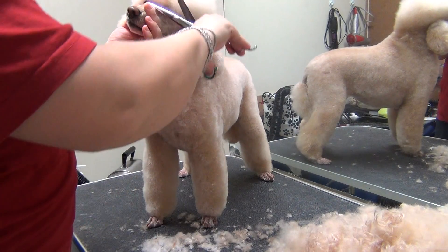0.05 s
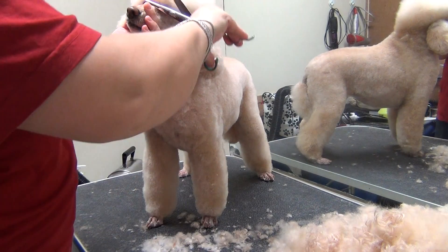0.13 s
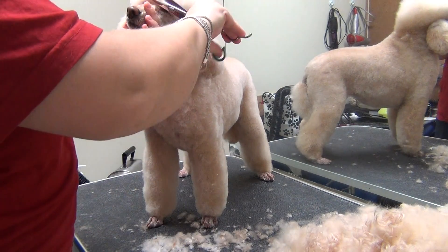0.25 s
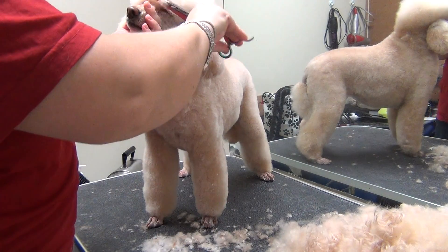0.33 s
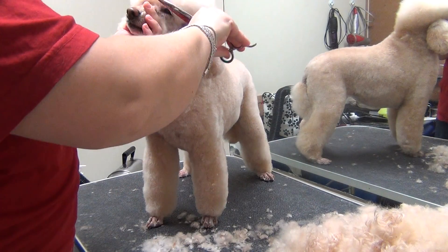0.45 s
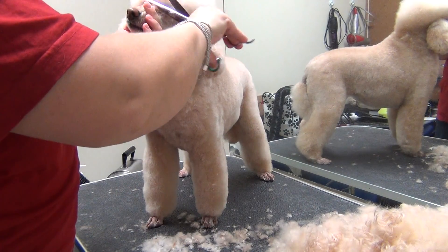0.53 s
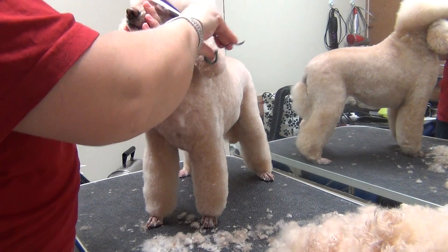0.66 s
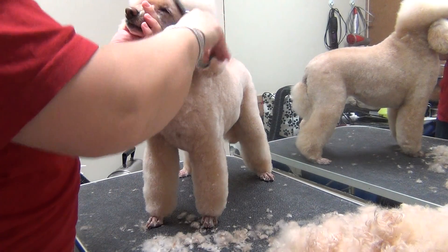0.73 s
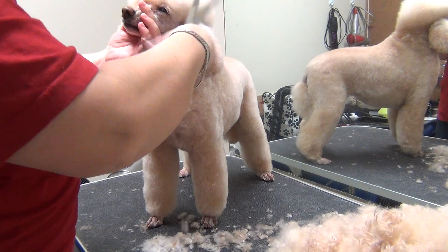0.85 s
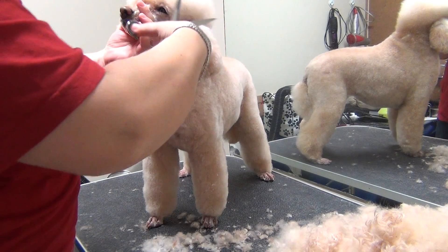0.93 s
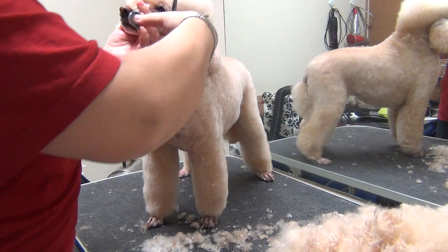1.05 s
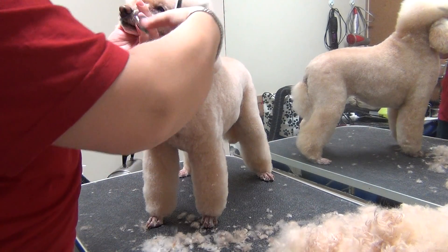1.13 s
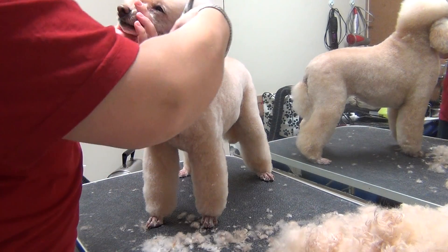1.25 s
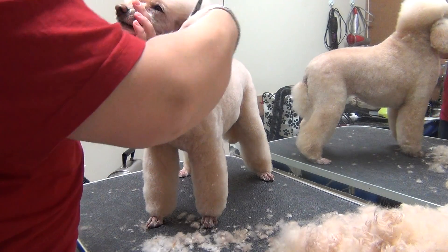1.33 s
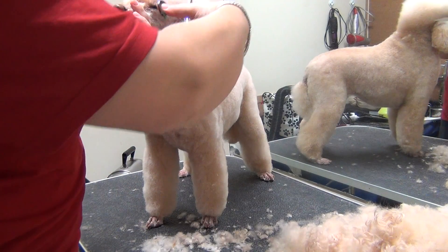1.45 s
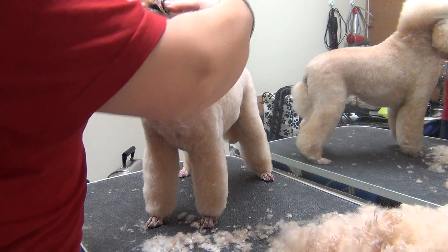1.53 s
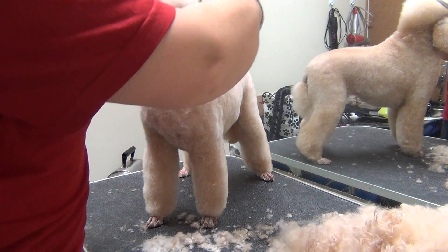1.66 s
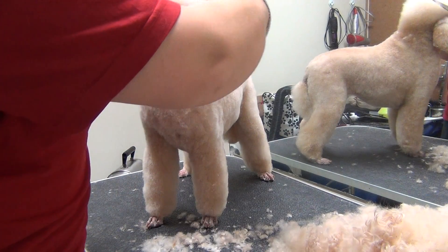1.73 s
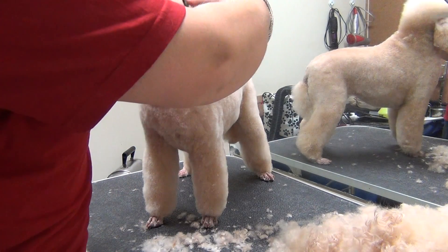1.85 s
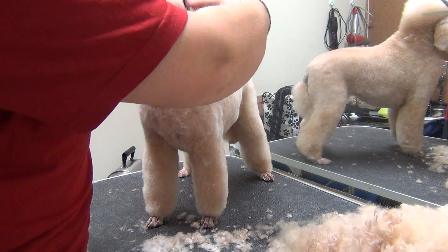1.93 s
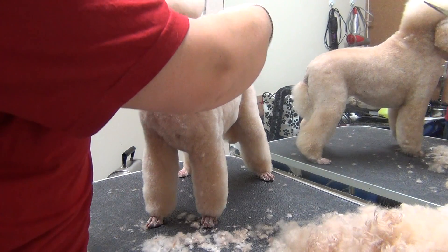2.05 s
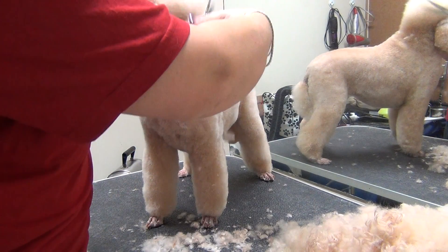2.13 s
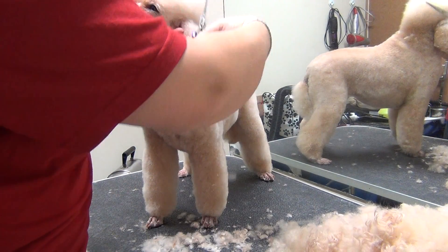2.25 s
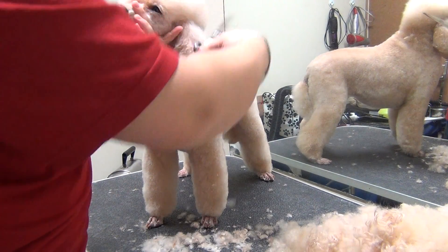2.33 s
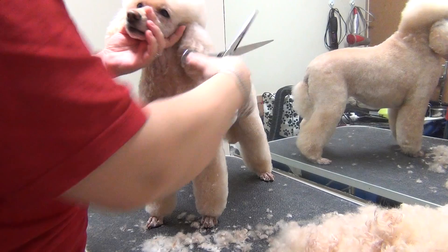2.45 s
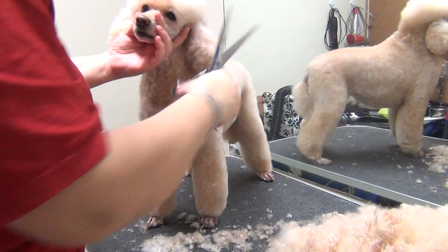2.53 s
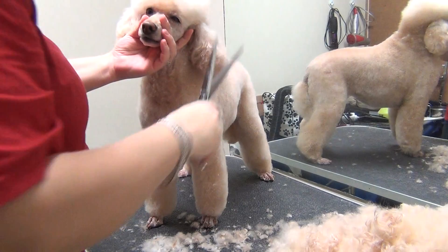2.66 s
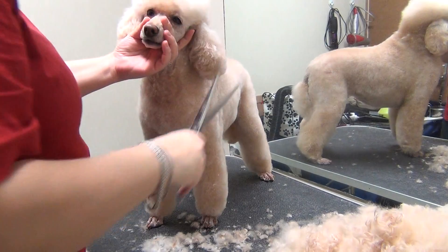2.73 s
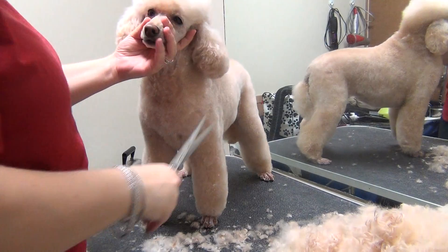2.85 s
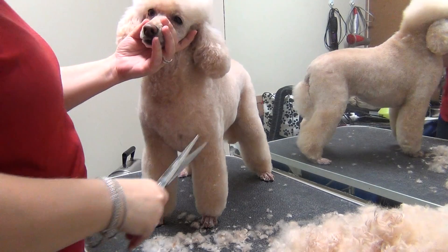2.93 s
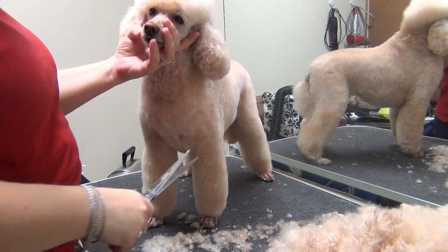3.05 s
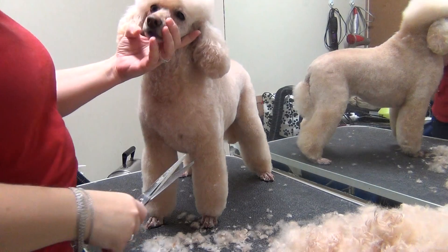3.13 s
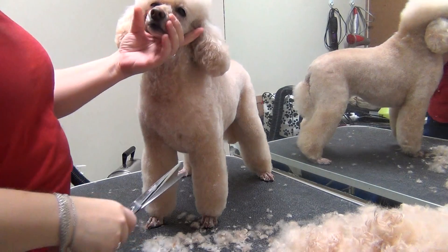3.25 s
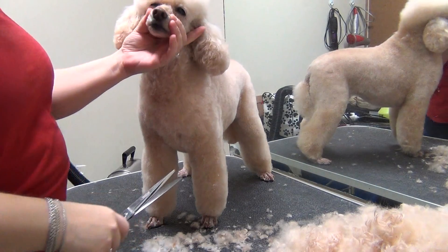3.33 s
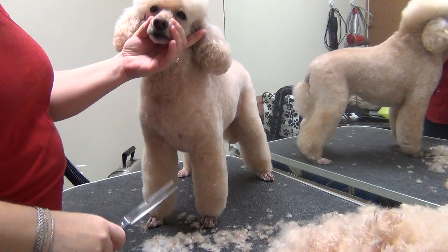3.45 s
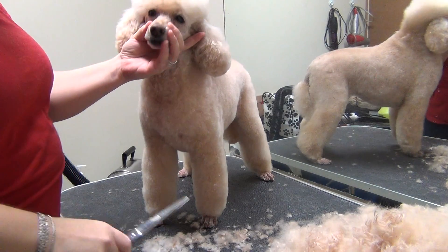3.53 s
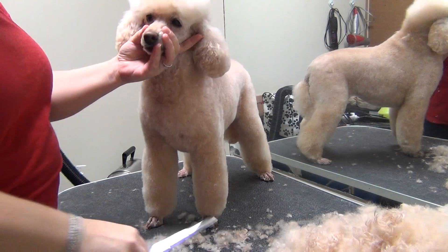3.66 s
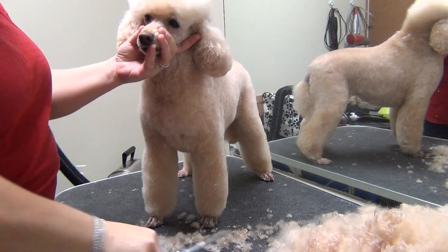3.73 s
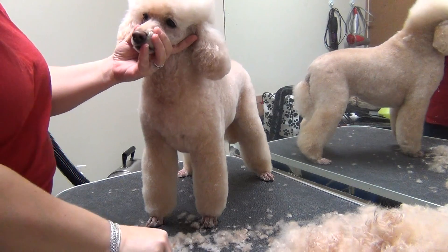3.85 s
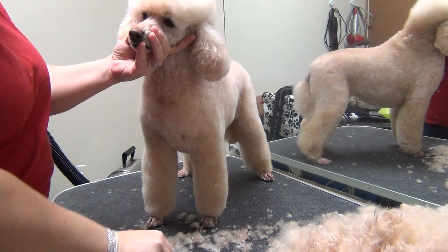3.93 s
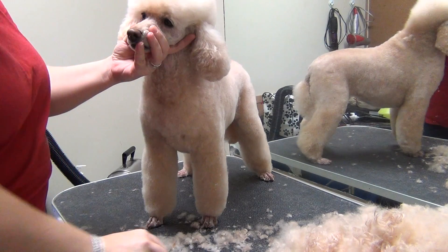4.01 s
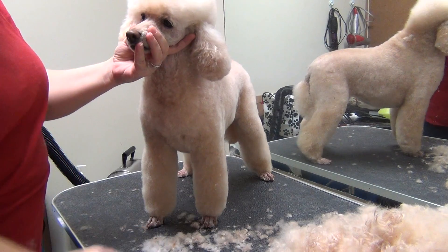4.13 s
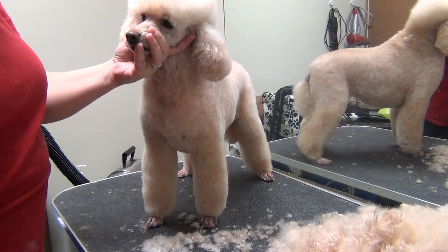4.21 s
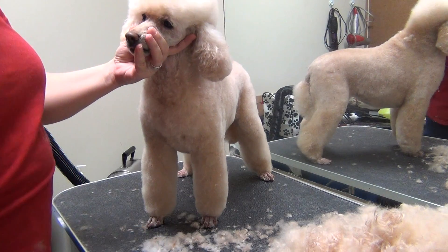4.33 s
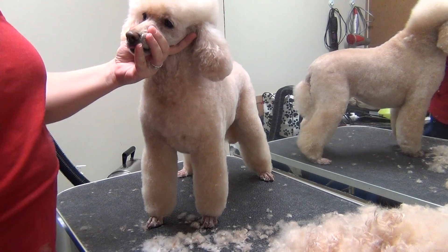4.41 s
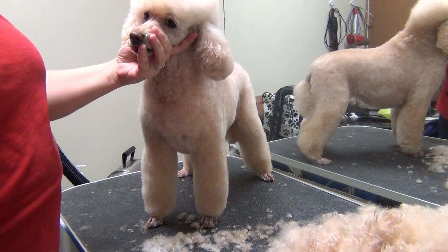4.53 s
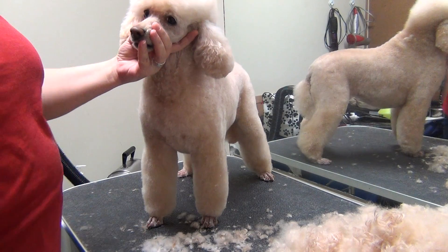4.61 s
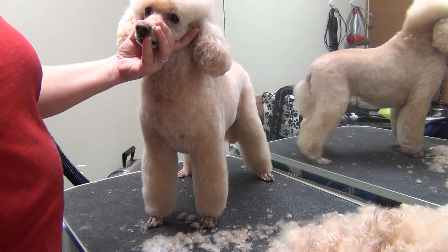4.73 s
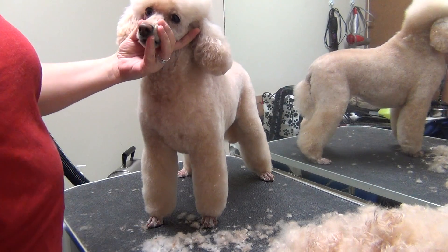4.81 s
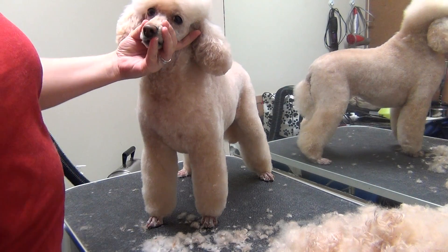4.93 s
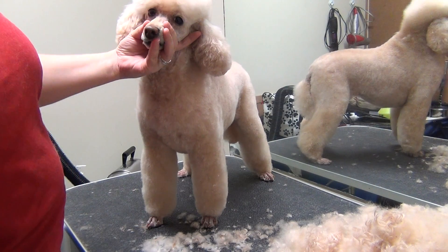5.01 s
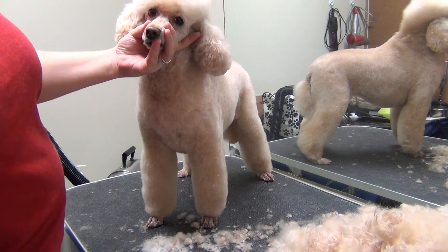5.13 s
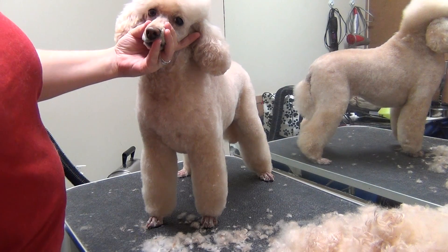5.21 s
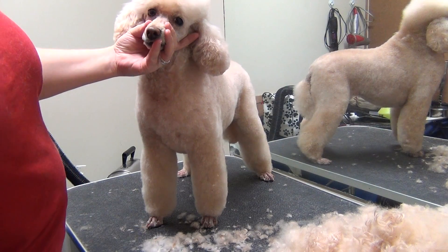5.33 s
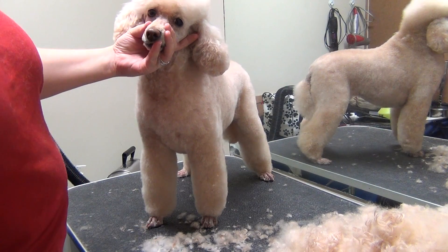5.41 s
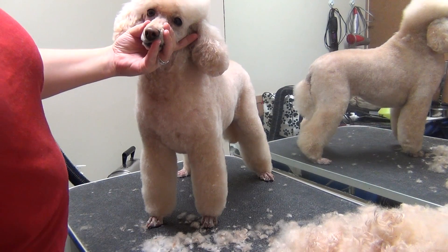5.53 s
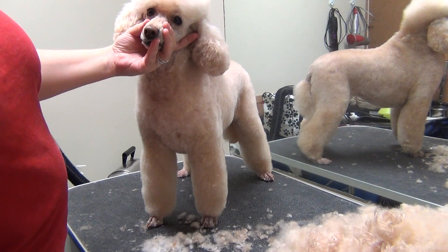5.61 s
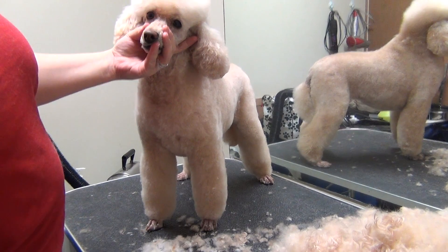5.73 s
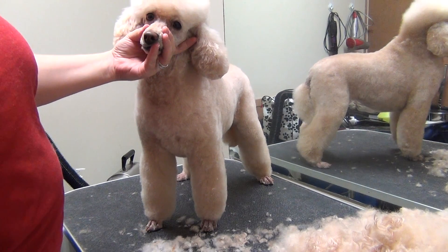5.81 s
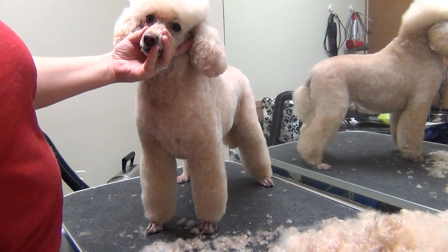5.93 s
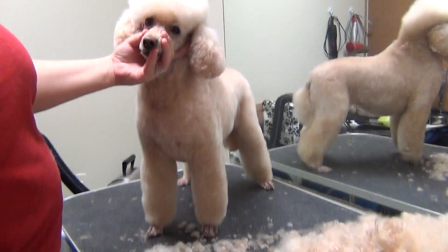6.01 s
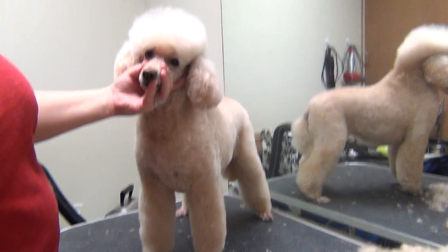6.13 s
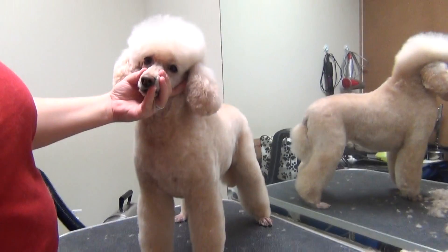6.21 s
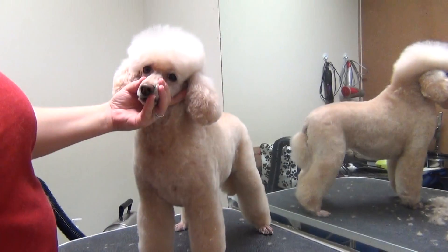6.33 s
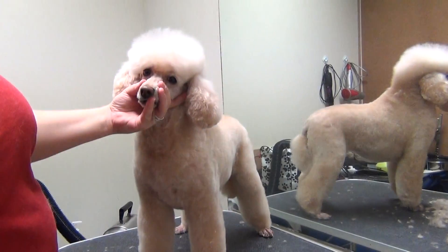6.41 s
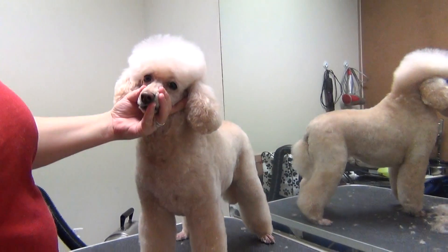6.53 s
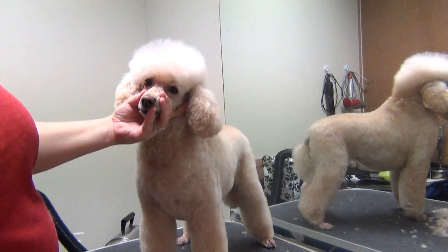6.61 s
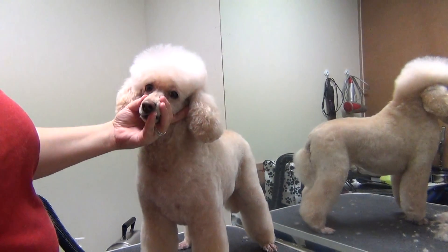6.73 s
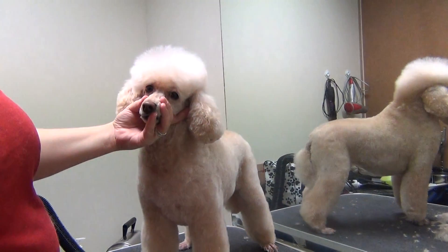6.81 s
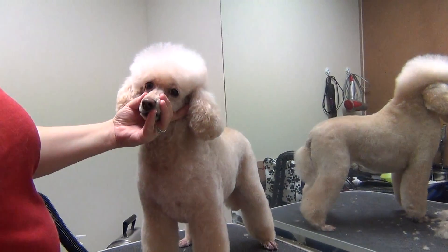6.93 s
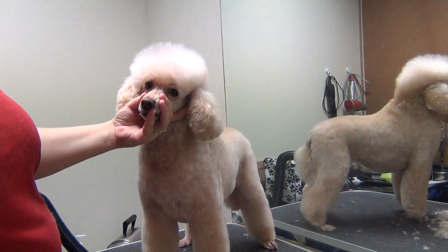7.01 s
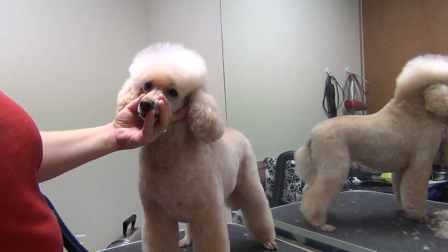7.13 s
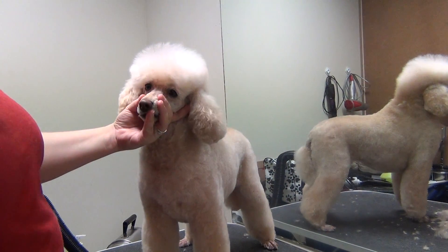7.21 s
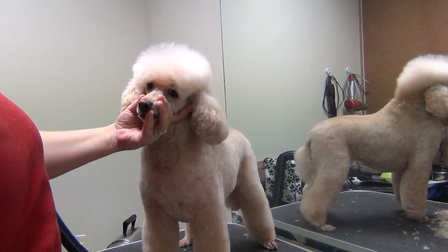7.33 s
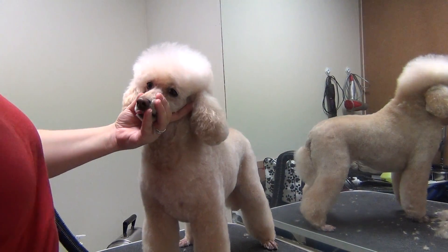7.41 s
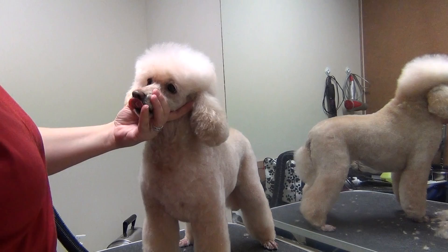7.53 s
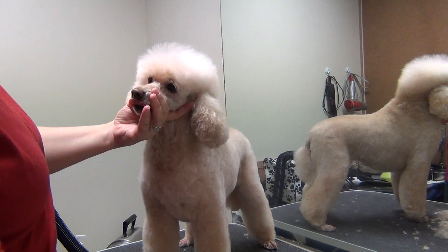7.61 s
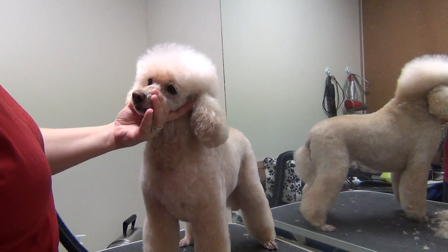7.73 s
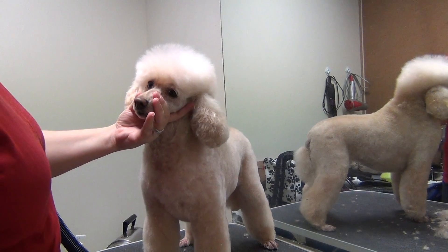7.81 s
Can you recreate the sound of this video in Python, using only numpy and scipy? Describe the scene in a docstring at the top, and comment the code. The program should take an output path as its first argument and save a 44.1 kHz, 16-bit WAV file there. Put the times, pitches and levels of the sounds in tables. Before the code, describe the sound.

Steel scissors trim a dog's fur in a small room, six quick, bright snips with a light scrape as the blades reopen. After one fainter snip they are laid on a table with a hollow, jingling clatter. Then the camera is handled right at the microphone: soft rubbing and bumps, a cluster of plastic snaps ending in a sharp clack, and a few weaker creaks. A faint fan runs underneath.

```python
"""Steel scissors scrape shut, click and slide open again as a groomer trims a dog's face in a small room.
Sliding friction and impact excite the blades' modes. The scissors are laid down on the resonant grooming
table with a clatter, a soft rushing tail and two faint tinks. Then a camera is handled and tilted, with
rubbing, rustling and bumps, and its plastic mount creaks by stick-slip, clacks and chirps. Under it all
are a faint fan and a thin electrical whine."""
import sys
import numpy as np
from scipy import signal
from scipy.fft import rfft, irfft, next_fast_len
from scipy.io import wavfile
from scipy.ndimage import map_coordinates

SR = 44100
rng = np.random.default_rng(int(sys.argv[2]) if len(sys.argv) > 2 else 0)


def transcribe(signal):
    """Save signal, clipped to [-1, 1], as a 16-bit WAV file at the path in sys.argv[1]."""
    frames = np.atleast_2d(signal).T
    limited = np.clip(frames, -1, 1)
    pcm = np.round(limited * 32767).astype(np.int16)
    wavfile.write(sys.argv[1], SR, pcm)


N = 347067
AGE = np.arange(SR // 2) / SR  # time since the onset of one event, t/s

# resonances of the shut blades: f/Hz, gain/dB
SHUT_MODES = [(4400, -2), (5950, -5), (8350, -2.5), (9950, 1), (10500, -13), (11650, -6), (12850, 6.5)]
# spectrum of the dull rubbing and rushing noise: f/Hz, relative level/dB
RUB_SPECTRUM = [(100, -23), (200, -6), (340, -2.5), (470, 0), (620, -2), (1000, -3), (1400, -6),
                (2300, -7.5), (3500, -11), (5600, -9.5), (8000, -35), (14000, -40)]


def cuts():
    """Friction and impact: the blades shear shut with a broad click, then the tips overrun."""
    # t/s when shut, relative scrape level/dB, relative click level/dB, ring f/Hz, ring gain/dB
    snips = [(.404, -43, -31.5, 8160, -3), (.748, -45, -49, 8100, -4), (1.303, -45, -37, 7830, 1.5),
             (1.723, -42, -36.5, 8320, 8), (2.072, -46.5, -33.5, 7680, 2), (2.3028, -42.5, -34.5, 7470, 0),
             (3.564, -52, -54, 6900, 5)]
    # spectra of the shearing and of the click: f/Hz, relative level/dB
    shear_spectrum = [(200, -38), (1500, -23), (2900, -25), (3800, -22.5), (4800, -7.5), (6300, -10.5),
                      (7300, -0.5), (8300, 0.5), (9000, -8), (11000, -15.5), (13000, -19), (15500, -24.5)]
    click_spectrum = [(200, -26), (600, -22.5), (1000, -25), (2300, -23), (2650, -14), (3020, -8.5),
                      (3700, -23.5), (4400, -16), (6050, -7.5), (6630, -11), (7700, 0), (8540, -16),
                      (9040, -10.5), (13200, -18), (15500, -19)]
    rows = []
    for t, scrape_db, click_db, ring_hz, ring_db in snips:
        rows.append((t, 0.015, scrape_db, click_db, ring_hz, ring_db))
        rows.append((t + 0.0135, 0.011, scrape_db - 4.5, scrape_db - 8.5, ring_hz, ring_db))  # overrun
    return amp(-0.5) * strokes(rows, shear_spectrum, click_spectrum, SHUT_MODES, rise_db=14.5,
                               rough_db=2, click_t60=0.025, ring_width_hz=180, wet_db=0.5)


def openings():
    """Static friction gives way to sliding: the blades part with a thinner scrape and a light stop."""
    # t/s of the stop, swell time/s, relative scrape level/dB, relative click level/dB, ring f/Hz
    slides = [(.563, 0.012, -50, -52, 7350), (.897, 0.013, -48.5, -42.5, 7850),
              (1.436, 0.015, -48, -42, 7700), (1.856, 0.021, -48.5, -47.5, 7960),
              (2.195, .018, -52, -41, 8000), (2.462, .012, -47, -45.5, 7670), (2.841, .035, -69, -72, 6940)]
    # spectrum of the parting blades: f/Hz, relative level/dB
    spectrum = [(1500, -27.5), (3300, -27), (4600, -15.5), (6000, -20), (6900, -4.5), (8000, -6.5),
                (8800, -6), (9800, -14.5), (11500, -17), (13000, -28), (15500, -24)]
    # resonances of the open blades: f/Hz, gain/dB
    open_modes = [(5380, 4), (7920, 1.8), (9350, 4.5), (9900, 6.9), (11780, 3)]
    rows, ring_db = [], 6.5
    for t, swell, scrape_db, click_db, ring_hz in slides:
        rows.append((t - 0.013, 0.0073, scrape_db - 6, scrape_db - 6, ring_hz, ring_db))  # coming loose
        rows.append((t, swell, scrape_db, click_db, ring_hz, ring_db))
        rows.append((t + 0.015, 0.015, scrape_db - 9, scrape_db - 9, ring_hz, ring_db))  # coasting on
    return amp(-1.1) * strokes(rows, spectrum, spectrum, open_modes, rise_db=22,
                               rough_db=3, click_t60=0.033, ring_width_hz=120, wet_db=1.5)


def bites():
    """Shear: just before they shut, the edges bite brightly into the hair, sometimes twice."""
    # edges meeting hair: t/s, swell time/s, level/dB
    contacts = [(.329, 0.021, -58), (0.361, 0.029, -53.5), (.722, 0.02, -53), (1.26, 0.019, -56),
                (1.283, 0.021, -49), (1.695, 0.0066, -44.5), (2.058, 0.01, -46), (2.293, 0.011, -45),
                (3.558, 0.026, -55)]
    # spectrum of a bite: f/Hz, relative level/dB
    spectrum = [(300, -41), (3500, -22), (5000, -15), (6300, -16), (7400, 2), (8400, -2.5), (9200, -8),
                (12000, -19), (15500, -23)]
    ring_hz, ring_db = 8140, -8
    rows = [(t, swell, db, db - 1.5, ring_hz, ring_db) for t, swell, db in contacts]
    return strokes(rows, spectrum, spectrum, SHUT_MODES, rise_db=14,
                   rough_db=2, click_t60=0.022, ring_width_hz=180, wet_db=0.5)


def strokes(rows, scrape_spectrum, click_spectrum, modes,
            rise_db, rough_db, click_t60, ring_width_hz, wet_db):
    """Forced vibration: edge scrapes on edge ever faster, then stops with a click; both ring the steel."""
    track = np.zeros((2, N))
    for t, swell, scrape_db, click_db, ring_hz, ring_db in rows:
        lead = 2 * swell  # from the soft onset to the stop
        swells_left = np.maximum(lead - AGE, 0) / swell
        braking = np.exp(-np.maximum(AGE - lead, 0) / 0.0037)
        scrape = amp(scrape_db - rise_db * swells_left ** 0.74) * braking * grit(rough_db)
        click = amp(click_db) * np.roll(burst(click_t60), round(lead * SR))
        drive = colour(scrape, scrape_spectrum) + colour(click, click_spectrum)
        contact_mode = (ring_hz, ring_db)  # depends on where the edges touch
        add(track, t - lead, room(resonate(drive, [*modes, contact_mode], ring_width_hz), wet_db))
    return track


def ping():
    """Free vibration: blades hardly damped by hair ring on after a snip."""
    # the ringing snip: t/s, level/dB
    snips = [(0.737, -49)]
    # modes of the free blades: f/Hz, relative level/dB, T60/s
    blade_modes = [(4710, -4, 0.23), (4850, -3, .14), (5210, 3, 0.17), (2980, -9, .1)]
    track = np.zeros((2, N))
    for t, db in snips:
        add(track, t, room(amp(db) * ring(blade_modes, scatter_db=1), wet_db=-10))
    return track


def lay_down():
    """Impact excites modes: as the scissors land, the table booms and raps and the steel jingles."""
    # modes of the table top, the handles and the loose scissors: f/Hz, relative level/dB, T60/s
    table_modes = [(123, -8.5, .36), (160, -16, .14), (213, 2.5, .32), (262, -4, .48), (295, -2, .2),
                   (404, -3.5, .24), (435, -10, .14), (569, -4, .14), (620, -9, .1), (676, -6, .13),
                   (780, -15, .18), (880, -14, .13)]
    handle_modes = [(1209, -6.5, 0.12), (1560, -8.5, 0.16), (2048, 0, 0.068), (2450, -3, .08),
                    (2612, -1, 0.1)]
    steel_modes = [(5970, -14, 0.21), (6270, -16.5, 0.19), (7320, -4, .17), (7460, -10, .062),
                   (7960, -8, .089), (8030, 5, .12), (8330, -6, 0.12), (8860, -14, .14), (11200, -2, .06),
                   (10700, -2, .06)]
    # contact noise of the table and of the steel: f/Hz, relative level/dB
    rap_spectrum = [(60, -48), (300, -17), (620, 1), (950, -10), (1250, -7), (1550, -10.5), (2080, -5.5),
                    (2650, -5.5), (3200, -13.5), (5000, -14), (9000, -38)]
    clink_spectrum = [(2000, -15.5), (4800, -15.5), (6200, -3), (7400, -0.5), (8500, 1.5), (9300, -4.5),
                      (11000, -13), (13000, -14), (15500, -27)]
    radiation = signal.butter(4, 100, "high", fs=SR)  # a small panel sheds little deep bass
    track = np.zeros((2, N))
    for t, thud_db, rap_db, steel_db in bounces(count=3):
        thud = amp(thud_db - 8.5) * signal.lfilter(*radiation, ring(table_modes, scatter_db=2))
        rap = amp(rap_db) * colour(fade(0.034) * grit(3), rap_spectrum)
        clank = amp(rap_db - 10.5) * ring(handle_modes, scatter_db=-3.5)
        jingle = amp(-7.5) * ring(steel_modes, scatter_db=4)
        clink = colour(fade(0.041) * grit(0.66), clink_spectrum)
        clatter = rap + clank + amp(steel_db) * (jingle + clink)
        add(track, t, pair(thud, -0.45 * thud) + room(clatter, wet_db=-2))
    return track


def bounces(count):
    """Inelastic rebound: flights tend to shorten; rap and jingle weaken while the thud holds up."""
    # rings and tips landing: t/s, then relative level/dB of thud, rap and steel
    landings = [(3.937, -33.5, -29.5, -42), (3.941, -30, -33, -28.5), (3.982, -34.5, -35.5, -33.5),
                (4.0035, -33.5, -40, -25), (4.020, -28.5, -43, -31), (4.040, -30, -48, -27.5),
                (4.083, -39.5, -60, -53), (4.395, -63.5, -58, -71)]
    flight_s, shrink, spread = 0.0105, 0.85, 0.12
    for t, thud_db, rap_db, steel_db in landings:
        for k, chance in enumerate(rng.standard_normal(count)):
            yield t, thud_db + 0.5 * k, rap_db - 11.5 * k, steel_db - 10 * k
            t += flight_s * shrink ** k * np.exp(spread * chance)


def tinks_and_snaps():
    """Impulsive excitation: the scissors tink on the table, then the plastic mount sticks and slips."""
    # spectrum common to tinks and snaps: f/Hz, relative level/dB
    spectrum = [(100, 3), (330, 11.5), (1000, 11.5), (2100, 5.5), (3800, 3), (5000, 1), (6800, 1.5),
                (8200, 5), (9300, -3.5), (12000, -10), (15500, -10)]
    # hollow resonances: f/Hz, gain/dB
    modes = [(1050, -9), (2100, -2), (2950, -31), (4970, -4), (6790, -26)]
    track = np.zeros((2, N))
    for t, db, pitch_hz in impulses():
        envelope = (fade(0.0057) + amp(-15.5) * fade(0.045)) * attack(0.00056)
        drive = envelope * rng.standard_normal(len(AGE))
        shudder = signal.lfilter(*signal.iirpeak(pitch_hz, 1.7, SR), drive)  # each favours its own band
        click = resonate(colour(shudder, spectrum), modes, width_hz=400)
        click *= np.linalg.norm(drive) / np.linalg.norm(click)
        add(track, t, room(amp(db + 6) * click, wet_db=-21))
    return track


def impulses():
    """Settling and stick-slip: tinks and snaps repeat once, softly; the strained mount slips unevenly."""
    # two faint high tinks of the scissors on the table, then snaps of mount and shell:
    # t/s, relative level/dB, f/Hz
    clicks = [(4.595, -44, 10800), (4.731, -49, 7750), (4.832, -51, 8000), (5.097, -47.5, 2260),
              (5.688, -43.5, 4550), (5.7719, -29, 5500), (5.777, -22.5, 3880), (5.7945, -19, 5200),
              (5.799, -22, 5800), (5.8508, -32, 3620), (5.857, -27.5, 7140), (5.872, -34.5, 5000),
              (5.9038, -32.5, 2370), (5.9226, -28.5, 5630), (5.9434, -30, 9100), (5.952, -25.5, 3530),
              (5.9616, -30.5, 6060), (5.9838, -37, 5870), (6.0235, -19, 6700), (6.0314, -29, 4800),
              (6.202, -50, 580), (6.853, -48, 4000), (6.886, -55.5, 5200), (6.9185, -47, 2090),
              (6.944, -42.5, 5500), (6.9642, -44.5, 4200), (6.967, -43, 2030), (6.987, -50, 600)]
    # spells of strain: start t/s, end t/s, relative level/dB
    strains = [(5.1, 5.42, -65), (6.858, 6.996, -56.5)]
    gap_s, scatter_db, slip_hz = 0.035, 4.5, 3400
    for t, db, pitch_hz in clicks:
        yield t, db, pitch_hz
        yield t + 0.0086, db - 17.5, pitch_hz
    for start, end, db in strains:
        for t in np.arange(start, end, gap_s):
            onset = t + gap_s * rng.random() / 2
            slip_db = db + scatter_db * rng.standard_normal()
            yield onset, slip_db, slip_hz * 2 ** rng.uniform(-0.76, 1)


def catch():
    """Hard impact on heavily damped modes: the mount locks with a brief clack."""
    # the mount locking: t/s, level/dB
    locks = [(6.0234, -12.5)]
    # modes of the catch: f/Hz, relative level/dB, T60/s
    catch_modes = [(2940, -12.5, .015), (6500, -1.5, 0.0097)]
    track = np.zeros((2, N))
    for t, db in locks:
        clack = amp(db) * attack(0.00061) * ring(catch_modes, scatter_db=1)
        add(track, t, room(clack, wet_db=-25))
    return track


def bumps():
    """Soft impact excites mainly low frequencies: the hand knocks on the camera, which rumbles."""
    # t/s, knock level/dB, rumble level/dB
    touches = [(4.974, -63, -76), (5.58, -59.5, -67), (5.668, -81, -66), (5.848, -60, -60.5),
               (6.979, -57.5, -80), (7.595, -57.5, -80), (7.643, -55, -76), (7.715, -59, -80)]
    # spectra of knock and rumble: f/Hz, relative level/dB
    knock_spectrum = [(25, -24), (70, -18), (140, 12.5), (210, 0), (350, -1), (700, -34), (2000, -59)]
    rumble_spectrum = [(20, -15), (45, 0), (85, 6), (200, -32), (600, -65)]
    track = np.zeros((2, N))
    for t, knock_db, rumble_db in touches:
        knock = amp(knock_db) * colour(attack(0.00098) * burst(0.28), knock_spectrum)
        rumble = amp(rumble_db) * colour(attack(0.0053) * burst(0.31), rumble_spectrum)
        add(track, t, room(knock + rumble, wet_db=-6))
    return track


def rush_and_rustle():
    """Noise swells add in power: rubbing, rustling and a soft rushing tail dying away after the clatter."""
    # faint rustles, the tail (4.137 and 4.38 s), then rubbing and rustling:
    # peak t/s, duration/s, relative dull level/dB, bright level/dB
    swells = [(1.674, .03, -78, -65), (2.606, 0.23, -67, -75.5), (3.4, 0.66, -69.5, -76.5),
              (4.137, 0.15, -54, -58.5), (4.38, 0.21, -67.5, -69.5), (4.78, 0.35, -64.5, -69),
              (5.004, 0.028, -54.5, -67), (5.148, 0.15, -59, -71), (5.337, 0.15, -59.5, -70.5),
              (5.623, 0.2, -63.5, -69), (5.84, 0.024, -50.5, -61), (6.964, 0.035, -59.5, -63.5),
              (7.632, 0.37, -64, -66.5), (7.722, 0.03, -70, -57)]
    # spectrum of the bright noise: f/Hz, relative level/dB
    bright_spectrum = [(2500, -9), (4500, -9), (7500, 1), (8700, -3), (10000, -12.5), (15000, -21)]
    t, duration, dull_db, bright_db = np.transpose(swells)[:, :, None]
    since = np.arange(N) / SR - t
    ramp_s = duration * np.where(since < 0, 0.45, 0.84)  # the rise is quicker than the fall
    power = np.exp(-(since / ramp_s) ** 2)
    envelope = lambda db: np.sqrt(np.sum(amp(db) ** 2 * power, 0))
    flutter = amp(1.8 * wobble(45, N))
    hollow = resonate(colour(grit(2.7, N), RUB_SPECTRUM), [(467, -1)], width_hz=83)
    dull = envelope(dull_db - 6) * flutter * hollow
    bright = envelope(bright_db) * colour(grit(3.3, N), bright_spectrum)
    return room(dull + bright, wet_db=-8)


def scuffs():
    """Stick-slip of skin: it catches on the shell, lets go at once and scrapes to a halt."""
    # t/s, level/dB, T60/s
    releases = [(4.973, -50.5, 0.23), (5.164, -53, .03), (5.183, -62, 0.032)]
    track = np.zeros((2, N))
    for t, db, t60 in releases:
        add(track, t, room(amp(db) * colour(fade(t60) * grit(2), RUB_SPECTRUM), wet_db=-8))
    return track


def squeak():
    """Amplitude modulation: the tilting mount chirps faintly, a pulsing tone that slowly rises."""
    # start and end of the glide: t/s, f/Hz
    glide = [(6.33, 3140), (6.85, 3570)]
    times, hz = np.transpose(glide)
    t = np.arange(N) / SR
    pulse_hz = 30
    pulses = np.maximum(np.sin(2 * np.pi * pulse_hz * t), 0) * (t > times[0]) * (t < times[-1])
    pitch = np.interp(t, times, hz) * (1 + 0.0121 * wobble(200, N))
    return amp(-77.5) * pulses * unit(np.sin(2 * np.pi * np.cumsum(pitch) / SR))


def background():
    """Broadband and narrowband sources: a distant fan, and an electrical whine with its sizzle."""
    # fan and microphone hiss: f/Hz, relative level/dB
    fan_spectrum = [(20, -18.5), (50, -3.5), (110, 0.5), (250, -1.5), (450, -4), (760, -4), (880, 1),
                    (1060, -8.5), (2000, -11.5), (4500, -14), (8000, -14.5), (11000, -18), (16000, -21)]
    drift = amp(-67.5 + 0.47 * wobble(3.28, N))
    fan = drift * pair(*colour(rng.standard_normal((2, N)), fan_spectrum))
    whine = amp(-77) * np.sin(2 * np.pi * 15625 * np.arange(N) / SR)
    sizzle = amp(-79.5) * unit(signal.lfilter(*signal.iirpeak(14550, 32, SR), rng.standard_normal(N)))
    return fan + whine + sizzle


def room(x, wet_db):
    """Reverberation: a sound gets a diffuse stereo tail and a quick scatter off nearby surfaces."""
    # reverberation time of the small room: f/Hz, T60/s
    decay_times = [(150, 0.13), (1000, 0.31), (4000, 0.25), (8000, 0.23), (14000, 0.14)]
    hz, t, spectra = signal.stft(rng.standard_normal((2, len(AGE))), SR, nperseg=256)
    decay = np.exp(-np.log(1000) * t / along(decay_times, hz)[:, None])
    tails = signal.istft(spectra * decay, SR, nperseg=256)[1][:, :len(AGE)]
    tails = amp(wet_db) * tails / np.linalg.norm(tails[0])
    scatter = burst(0.0058)
    tails[1] += scatter / np.linalg.norm(scatter)
    mid, side = signal.fftconvolve(x[None], tails, axes=1)[:, :len(x)]
    return pair(x + mid, side)


def ring(modes, scatter_db):
    """Modal superposition: the point of contact gives each damped mode a new strength and sign."""
    hz, db, t60 = np.transpose(modes)[:, :, None]
    gain = amp(db + scatter_db * rng.standard_normal(db.shape))
    gain *= np.sign(rng.standard_normal(db.shape))
    return np.sum(gain * fade(t60) * np.sin(2 * np.pi * hz * AGE), 0) / np.sqrt(np.sum(gain ** 2) / 2)


def resonate(x, modes, width_hz):
    """Resonance: a sound plus the narrow modes (f/Hz, gain/dB) that it drives."""
    return x + sum(amp(db) * signal.lfilter(*signal.iirpeak(hz, hz / width_hz, SR), x)
                   for hz, db in modes)


def colour(x, spectrum):
    """Minimum-phase filtering at unit energy with a spectrum of (f/Hz, level/dB) points."""
    size = 2 * next_fast_len(x.shape[-1] // 2 + len(AGE) // 2)
    hz = np.fft.rfftfreq(size, 1 / SR)
    cepstrum = irfft(np.log(unit(amp(along(spectrum, hz)))))
    cepstrum[1:size // 2] *= 2  # folding onto positive time makes the filter causal
    cepstrum[size // 2 + 1:] = 0
    return irfft(rfft(x, size) * np.exp(rfft(cepstrum)), size)[..., :x.shape[-1]]


def grit(rough_db, size=len(AGE)):
    """Roughness: noise modulated into clumps of about a millisecond."""
    return unit(rng.standard_normal(size) * amp(rough_db * wobble(700, size)))


def wobble(rate, size):
    """Smooth random fluctuation with rate knots a second."""
    knots = rng.standard_normal(int(size * rate / SR) + 4)
    return map_coordinates(knots, [np.arange(size) * rate / SR])


def burst(t60):
    """Exponentially damped white noise."""
    return fade(t60) * rng.standard_normal(len(AGE))


def fade(t60):
    """Exponential decay by 60 dB in t60 seconds."""
    return np.exp(-np.log(1000) * AGE / t60)


def attack(tau_s):
    """First-order rise with time constant tau_s."""
    return 1 - np.exp(-AGE / tau_s)


def along(points, hz):
    """Interpolation of (f/Hz, value) points on a logarithmic frequency axis."""
    f, values = np.transpose(points)
    return np.interp(np.log(hz + 1), np.log(f + 1), values)


def amp(db):
    """Amplitude ratio of a level in dB."""
    return 10 ** (np.asarray(db) / 20)


def unit(x):
    """Normalisation to unit RMS."""
    return x / np.sqrt(np.mean(x ** 2) + 1e-20)


def pair(mid, side):
    """Left and right as sum and difference of mid and side."""
    return np.array([mid + side, mid - side])


def add(track, t, x):
    """Superposition of an event on the track at t seconds."""
    start = round(t * SR)
    track[:, start:start + x.shape[-1]] += x[..., :N - start]


def scene():
    """Linear superposition of all the sources."""
    scissors = cuts() + openings() + bites() + ping() + lay_down()
    small_noises = tinks_and_snaps() + bumps() + catch() + rush_and_rustle() + scuffs() + squeak()
    return scissors + small_noises + background()


def record(dry):
    """Coherence: two close capsules hear much the same, so the image narrows; the top is band-limited."""
    # stereo width: f/Hz, side level relative to mid/dB
    width = [(40, 0.5), (140, -10.5), (280, -9), (500, -13), (1000, -14), (2000, -19), (3000, -25.5),
             (3900, -35), (6200, -8), (8000, -12), (10500, -15.5), (14000, -26)]
    # bass imbalance of the capsules: f/Hz, left level relative to right/dB
    imbalance = [(40, 2), (130, -2.5), (280, -0.5), (550, 0)]
    top_hz = 15900
    size = next_fast_len(N + SR // 2)
    hz = np.fft.rfftfreq(size, 1 / SR)
    left, right = rfft(dry, size) * (hz < top_hz)
    narrow = pair((left + right) / 2, amp(along(width, hz)) * (left - right) / 2)
    balance = amp(pair(0, along(imbalance, hz) / 2))
    return irfft(narrow * balance, size)[:, :N]


dry = scene()
out = record(dry)
transcribe(out)
```